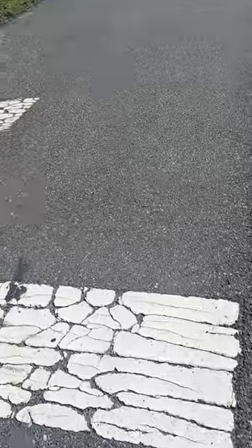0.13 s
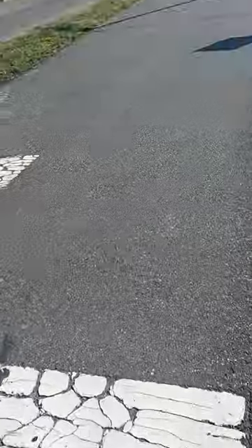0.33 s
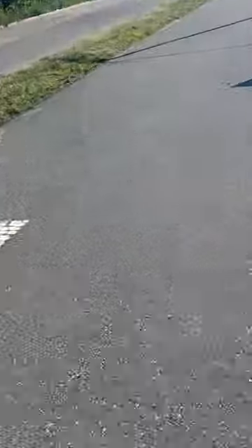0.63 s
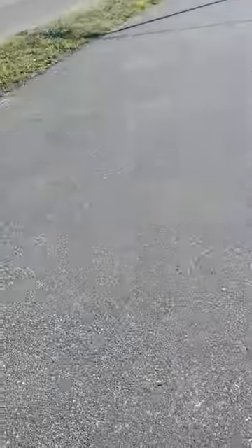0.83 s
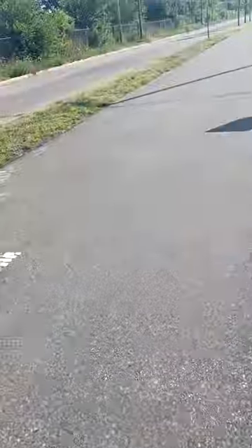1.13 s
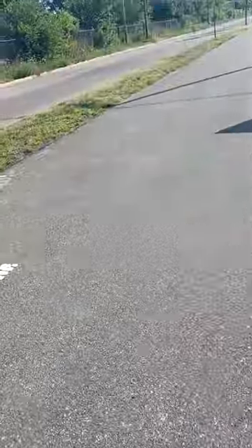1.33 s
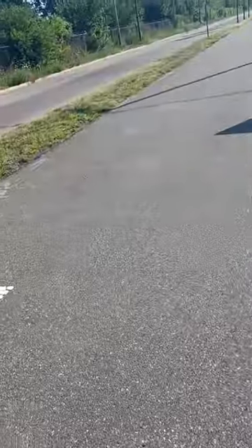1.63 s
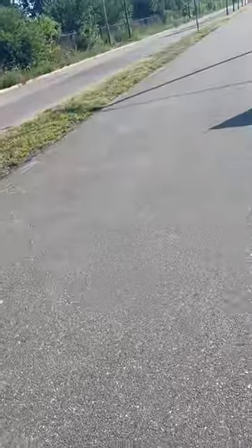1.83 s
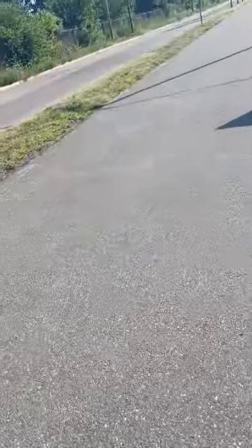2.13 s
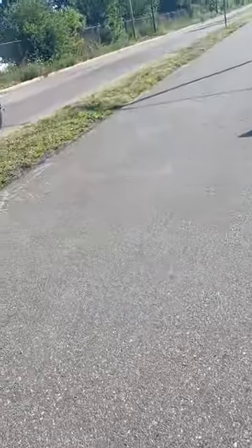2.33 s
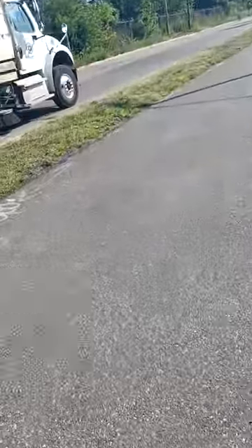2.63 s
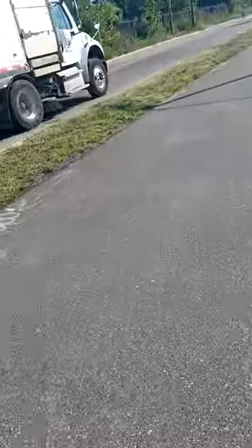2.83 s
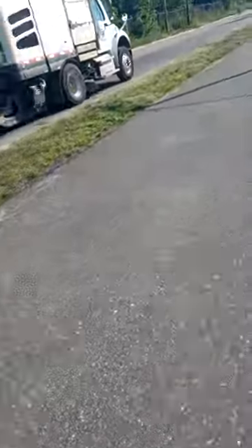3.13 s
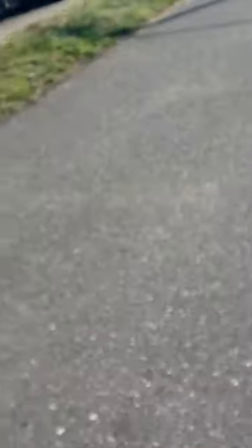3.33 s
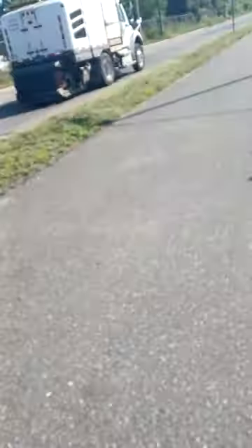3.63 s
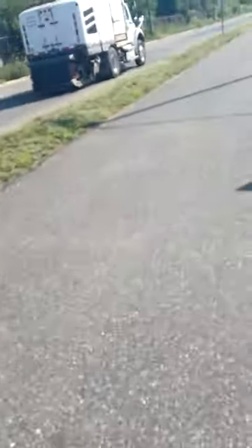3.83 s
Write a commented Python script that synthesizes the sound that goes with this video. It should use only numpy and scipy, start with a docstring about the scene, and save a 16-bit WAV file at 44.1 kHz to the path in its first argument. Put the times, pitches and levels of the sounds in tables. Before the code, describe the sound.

Close roadside stereo pickup of a diesel sweeper truck: the front roars in, the side passes with grit and thin whine, then the rear moves away, with a metallic bump and a small puff of air.

```python
"""Street sweeper truck passing outdoors

A diesel drones in rough engine orders; the front roars on approach as flutter-shaped stereo noise.
Alongside, grit ticks ring, a sharp-edged band of the roar and a thin whine sink in pitch; the rear recedes.
On leaving, jolts ring the body modes with a short rattle, and a little air spits out.
"""
import sys
import numpy as np
from scipy import signal
from scipy.fft import rfft, irfft, next_fast_len
from scipy.io import wavfile
from scipy.ndimage import map_coordinates

SR = 44100
rng = np.random.default_rng(int(sys.argv[2]) if len(sys.argv) > 2 else 0)


def generate_wav(signal):
    """Clip the signal to [-1, 1] and save it as 16-bit WAV at the path in sys.argv[1]."""
    frames = np.transpose(np.atleast_2d(signal))
    scaled = np.clip(frames, -1, 1) * 32767
    pcm = np.round(scaled).astype(np.int16)
    wavfile.write(sys.argv[1], SR, pcm)


N = 175959
T = np.arange(N) / SR
SPLIT = np.array([[.5], [-.5]])   # shares an L-R balance in dB between the channels

# diesel: (time [s], half the firing rate [Hz], level of multiple 2 [dB], of 3 [dB], of 4 [dB])
DIESEL_ORDERS = [(0.12, 43.1, -32, -39, -39), (0.5, 44.4, -30.5, -41, -38), (0.72, 44.7, -32, -40, -38),
                 (0.95, 42.3, -32.5, -31, -37), (1.2, 41.7, -31.5, -30, -36), (1.42, 43.3, -32.5, -39, -39),
                 (1.68, 45, -32, -38, -35), (1.95, 44.2, -33, -31, -38), (2.22, 39, -38, -42, -41),
                 (2.4, 37.8, -46, -41, -42), (3.35, 35.7, -50, -44, -44), (3.65, 36.2, -48, -44, -33.5),
                 (3.95, 37.7, -44, -31, -34)]
# roar of the truck's side: (time [s], level [dB])
SIDE_LEVEL = [(0.1, -32), (0.9, -27.5), (1.3, -23), (1.7, -22.5), (2.1, -22), (2.45, -24.5), (2.8, -32.5),
              (4.0, -38)]
# roar of the truck's rear: (time [s], level [dB])
REAR_LEVEL = [(0.1, -77), (1.9, -30.5), (2.4, -25), (2.8, -23.5), (3.2, -26.5), (3.7, -29), (4.0, -30.5)]
# body jolts: (time [s], level [dB], brightness [dB per octave])
JOLTS = [(3.0265, -20, -6), (3.0345, -22, -1.5), (3.057, -36, 8), (3.066, -41, 7), (3.295, -43, 8),
         (3.629, -40, 5)]


def from_db(db):
    """Decibels to gain."""
    return 10 ** (np.asarray(db) / 20)


def rms_one(x):
    """Scale to rms 1."""
    return x / np.sqrt(np.mean(x ** 2) + 1e-20)


def in_time(rows):
    """One curve per column, joined by straight lines."""
    s, *columns = np.transpose(rows)
    return [np.interp(T, s, column) for column in columns]


def at_hz(points, hz):
    """Read a spectrum on a log-frequency axis."""
    f, value = np.transpose(points)
    return np.interp(np.log(hz + 1e-3), np.log(f), value)


def phase(hz):
    """Running phase in radians of a moving frequency."""
    return 2 * np.pi * np.cumsum(hz) / SR


def bell(centre_s, length_s):
    """Gaussian rise and fall, peak 1."""
    return np.exp(-.5 * ((T - centre_s) / length_s) ** 2)


def band_passed(x, order, low_hz, high_hz):
    """Butterworth band-pass."""
    return signal.sosfilt(signal.butter(order, [low_hz, high_hz], "band", fs=SR, output="sos"), x)


def low_passed(x, order, hz):
    """Butterworth low-pass."""
    return signal.sosfilt(signal.butter(order, hz, fs=SR, output="sos"), x)


def drift(rate_hz):
    """Slow chance with spread 1: low-passed noise drawn at every 40th sample."""
    r = np.exp(-80 * np.pi * rate_hz / SR)
    noise = rng.standard_normal(N // 40 + 2002)
    slow = signal.lfilter([1], [1, -2 * r, r * r], noise)[2000:]   # drop the settling
    return np.interp(np.arange(N) / 40, np.arange(len(slow)), rms_one(slow))


def delayed(x, samples):
    """Read a signal through a fixed or moving delay."""
    return map_coordinates(x, [np.arange(N) - samples], order=3, mode="mirror")


def ring(clicks, hz, t60_s):
    """Two-pole resonator: a unit click sets a decaying sine of height 1 ringing."""
    r, w = np.exp(-np.log(1000) / (t60_s * SR)), 2 * np.pi * hz / SR
    return signal.lfilter([0, np.sin(w)], [1, -2 * r * np.cos(w), r * r], clicks + 1e-18)


def pair(mid, side, hz):
    """Left and right from two noises, less alike towards the treble."""
    # (frequency [Hz], left-right likeness [0-1])
    likeness = [(60, .997), (150, 1), (300, 0.99), (600, 0.92), (1300, 0.76), (3000, 0.44), (6000, 0.055),
                (15000, 0.057)]
    alike = np.clip(at_hz(likeness, hz), 0, .998)
    difference = np.sqrt(1 - alike) * side * np.array([[1], [-1]])
    return (np.sqrt(1 + alike) * mid + difference) / np.sqrt(2)


def diesel():
    """Slightly rough engine orders, and the firing throb that they put on the roar."""
    # higher tones of engine and belt drives: (start [s], end [s], multiple, level [dB])
    overtones = [(0, .74, 8, -34.5), (.35, 1.02, 7, -34), (.35, .9, 12.72, -32.5), (0, .85, 18.3, -39),
                 (0, .4, 6, -38), (.98, 1.25, 6, -33), (.95, 1.25, 12.6, -34), (.98, 1.2, 10.6, -35),
                 (.85, 2.1, 5.68, -35), (1.6, 1.95, 7, -37), (2.1, 2.5, 6.03, -30), (2.7, 4.1, 6.03, -38)]
    fade_s, roughness, speed_jitter, throb_depth = .16, .22, .004, .044
    hz, *levels = in_time(DIESEL_ORDERS)
    turn = phase(hz * (1 + speed_jitter * drift(8.5)))
    orders = [(k + 2, from_db(db)) for k, db in enumerate(levels)]
    for start, end, multiple, db in overtones:
        fade = np.clip(.5 + np.minimum(T - start, end - T) / fade_s, 0, 1)
        orders.append((multiple, from_db(db) * fade))
    tones = 0
    for multiple, gain in orders:
        rough_gain = gain * (1 + roughness * drift(7.4))
        tones = tones + rough_gain * np.sin(multiple * turn + 2 * np.pi * rng.random())
    throb = 1 + throb_depth * (np.cos(2 * turn) + .32 * np.cos(turn))
    return np.sqrt(2) * tones, throb


def combustion():
    """One short, uneven crack per firing, strongest as the engine bay goes by."""
    level_db, spread_db, bay_s, bay_length_s = -39.5, 1.5, 1.3, .91
    firings = np.floor(np.cumsum(2 * in_time(DIESEL_ORDERS)[0]) / SR)
    strength = from_db(spread_db * np.clip(rng.standard_normal(N), -2, 2))
    clicks = np.diff(firings, prepend=0) * strength
    cracks = band_passed(clicks + 1e-18, 2, 250, 2180)
    return rms_one(cracks) * from_db(level_db) * bell(bay_s, bay_length_s)


def roar(spectrum, balance):
    """Turbulent stereo noise whose octaves flutter on their own; rms 1 before a slow surge."""
    flutter_db, surge_db = 1.32, .5
    size = next_fast_len(N)
    hz = np.arange(size // 2 + 1) * SR / size
    colour = from_db(at_hz(spectrum, hz) + at_hz(balance, hz) * SPLIT)
    noise = pair(*rfft(rng.standard_normal((2, size))), hz) * colour
    octave, out = np.clip(np.log2(hz / 100 + 1e-9), 0, 7), 0
    for k in range(8):
        weight = np.maximum(1 - abs(octave - k), 0)
        band = irfft(noise * weight, size)[:, :N]
        out = out + band * from_db(flutter_db * drift(33))
    return rms_one(out) * from_db(surge_db * drift(2.5))


def front_roar():
    """Broad turbulent noise of the truck's front."""
    # (frequency [Hz], density [dB per Hz])
    spectrum = [(30, -48), (50, -13), (75, -7), (130, 4.5), (190, -8.5), (240, 0), (290, -6), (390, 2),
                (480, -4), (610, 2), (800, 2.5), (920, -3), (1100, -1), (1400, -12.5), (1750, -9),
                (2280, -3.5), (3050, -13), (4300, -15.5), (5300, -22.5), (7000, -25), (7900, -37),
                (10000, -32.5), (12800, -24.5), (15500, -30.5)]
    # (frequency [Hz], L-R [dB])
    balance = [(100, 4.5), (380, 3), (700, -2), (1290, 5.5), (2380, 3.5), (4400, 3.5), (7500, 14.5),
               (10000, 5), (15000, -2)]
    # (time [s], level [dB])
    level = [(0.1, -23.5), (0.55, -22), (1.0, -24), (1.4, -26), (1.9, -31.5), (2.5, -45), (4.0, -41)]
    return from_db(in_time(level)[0]) * roar(spectrum, balance)


def side_roar():
    """Broad turbulent noise of the truck's side."""
    # (frequency [Hz], density [dB per Hz])
    spectrum = [(30, -44), (55, -16), (80, -2), (130, 7), (175, 3.5), (240, 7.5), (330, 2.5), (430, 4),
                (520, -3), (640, 4), (800, -5.5), (950, -4.5), (1180, -5.5), (1380, -7.5), (1900, -1.5),
                (2750, -19.5), (3400, -20.5), (4600, -16), (5500, -19), (7000, -28), (7800, -34.5),
                (10000, -30), (12500, -25.5), (15500, -30.2)]
    # (frequency [Hz], L-R [dB])
    balance = [(100, 2), (380, -1.5), (700, -7.5), (1290, -4), (2380, -13.5), (4400, -8.5), (8000, 1.5),
               (15000, -1)]
    return from_db(in_time(SIDE_LEVEL)[0]) * roar(spectrum, balance)


def rear_roar():
    """Broad turbulent noise of the rear blower."""
    # (frequency [Hz], density [dB per Hz])
    spectrum = [(30, -29), (55, -17.5), (100, 2.5), (145, 1.5), (178, -4), (225, 4.5), (330, 0.5),
                (440, 1.5), (550, -5), (650, -5.5), (900, -7.5), (1120, -3.5), (1420, -18), (1980, -13),
                (2700, -19), (4000, -22), (5500, -32.5), (7000, -33.5), (7800, -49), (10500, -44.5),
                (13000, -36.5), (15500, -40)]
    # (frequency [Hz], L-R [dB])
    balance = [(100, -3.5), (380, 0.5), (700, -16.5), (1290, -3), (2380, -3), (4400, -4.5), (8000, 13),
               (15000, 7)]
    return from_db(in_time(REAR_LEVEL)[0]) * roar(spectrum, balance)


def ground_band():
    """Sharp-edged band of the roar, coloured by the ground reflection, sinking in pitch."""
    # (time [s], centre [Hz], level [dB])
    sinking = [(0.9, 2180, -55), (1.22, 2130, -29.5), (1.45, 2080, -37), (1.85, 2052, -42.5),
               (2.1, 1890, -39), (2.4, 1815, -46), (2.8, 1750, -65)]
    width_hz, pan_db = 950, 1
    hz, db = in_time(sinking)
    turn = phase(hz)
    a, b = low_passed(rng.standard_normal((2, 2, N)), 6, width_hz / 2)
    shifted = a * np.sin(turn) + b * np.cos(turn)   # low noise carried up to the centre
    return rms_one(pair(*shifted, hz.mean())) * from_db(db + pan_db * SPLIT)


def grit():
    """Bristles flick grit: dense ticks ring twelve high modes, following side and rear levels."""
    ticks_per_s, level_db, spread_db = 240, -34, -1.5   # level against the side roar
    sizes = from_db(spread_db * np.minimum(rng.exponential(1, N), 4)) * rng.choice([-1, 1], N)
    clicks = sizes * (rng.random(N) < ticks_per_s / SR)
    dealt = rng.integers(0, 12, N)   # the mode each tick strikes
    modes_hz = np.geomspace(1600, 6500, 12)
    ticks = rms_one(sum(ring(clicks * (dealt == k), hz, 7 / hz) for k, hz in enumerate(modes_hz)))
    side, rear = from_db(in_time(SIDE_LEVEL)[0]), from_db(in_time(REAR_LEVEL)[0])
    return (side + rear / 2) * from_db(level_db) * ticks


def fan():
    """Suction fan hum: one sine of moving pitch, loudest alongside."""
    # (time [s], frequency [Hz], level [dB])
    hum = [(0.1, 209, -44), (1.15, 203, -42), (1.4, 205, -32), (1.65, 209, -27), (2.05, 204, -31),
           (2.4, 201, -44), (4.0, 200, -46)]
    hz, db = in_time(hum)
    return np.sqrt(2) * from_db(db) * (1 + .083 * drift(3)) * np.sin(phase(hz))


def whine():
    """Breathy, fluttering hydraulic tone: narrow and wide noise on a carrier that sinks in pitch."""
    # (time [s], frequency [Hz], level [dB], share of wide hiss [0-1])
    tone = [(0.1, 4820, -41, 1), (1.1, 4750, -42, .92), (1.5, 4590, -46, .8), (1.85, 4560, -42.5, .75),
            (2.2, 4420, -45, .6), (2.43, 4378, -40.5, .5), (2.56, 4355, -45, .4), (2.68, 4340, -45.5, .35),
            (2.77, 4310, -59, .2), (4.0, 4290, -62, .3)]
    # (time [s], L-R [dB])
    tone_balance = [(1.5, 4), (2.3, -10)]
    narrow_hz, hiss_hz, flutter_db = 45, 260, 1.8
    hz, db, wide = in_time(tone)
    turn, wide = phase(hz), np.clip(wide, 0, 1)

    def carried(width_hz):
        return drift(width_hz) * np.sin(turn) + drift(width_hz) * np.cos(turn)

    mid, side = (np.sqrt(1 - wide) * carried(narrow_hz) + np.sqrt(wide) * carried(hiss_hz)
                 for _ in range(2))
    balance_db = in_time(tone_balance)[0] * SPLIT
    return from_db(db + balance_db + flutter_db * drift(7.6)) * pair(mid, side, hz.mean())


def swelling_bands(rows):
    """Bands of noise, each rising and falling in a bell shape."""
    out = 0
    for s, length_s, hz, width_hz, db in rows:
        low_hz, high_hz = max(hz - width_hz / 2, 20), min(hz + width_hz / 2, SR / 2 - 10)
        noise = pair(*band_passed(rng.standard_normal((2, N)), 2, low_hz, high_hz), hz)
        out = out + rms_one(noise) * from_db(db) * bell(s, length_s)
    return out


def roar_swells():
    """Bands of the roar that briefly swell, low to high."""
    # (time [s], length [s], frequency [Hz], width [Hz], level [dB])
    swells = [(0.91, 0.085, 218, 50, -31.5), (0.89, 0.22, 850, 120, -30.5), (1.07, 0.12, 608, 190, -30.5),
              (1.61, 0.14, 750, 220, -28), (1.83, 0.22, 3300, 560, -37.5), (1.9, 0.13, 5200, 950, -45),
              (1.36, 0.2, 485, 45, -35), (2.16, 0.07, 277, 46, -29), (2.28, 0.079, 312, 56, -27),
              (2.364, 0.069, 405, 60, -28), (2.3, 0.25, 1140, 220, -35), (2.48, 0.07, 2600, 220, -39),
              (4.05, 0.12, 120, 28, -31), (3.96, 0.1, 240, 64, -32)]
    return swelling_bands(swells)


def whistle():
    """Narrow band of noise, brief as the side goes by."""
    # (time [s], length [s], frequency [Hz], width [Hz], level [dB])
    whistles = [(1.97, .16, 5160, 60, -51)]
    return swelling_bands(whistles)


def high_hiss():
    """High bands of hiss that rise and fall, louder on the right."""
    # (time [s], length [s], frequency [Hz], width [Hz], level [dB])
    hisses = [(1.35, 0.25, 13600, 3000, -50), (3.3, 0.12, 3900, 1200, -42.5), (3.5, 0.5, 13150, 480, -59)]
    pan_db = -7.5
    return swelling_bands(hisses) * from_db(pan_db * SPLIT)


def spit():
    """A puff of bright hiss that swells to a point and dies."""
    # (frequency [Hz], density [dB per Hz])
    spectrum = [(5000, -16), (8200, -16), (10500, -11), (13300, 0), (15500, -7)]
    peak_s, fade_s, level_db = 3.262, .035, -41
    hz = np.arange(N // 2 + 1) * SR / N
    hiss = irfft(rfft(rng.standard_normal((2, N))) * from_db(at_hz(spectrum, hz)), N)
    return rms_one(hiss) * from_db(level_db) * np.exp(-abs(T - peak_s) / fade_s)


def knocks():
    """Each jolt strikes every steel body mode at its own strength; right ear later and louder."""
    # (frequency [Hz], level [dB], t60 [s])
    body = [(1010, 2, .028), (1230, 8.5, .026), (1480, 3, .028), (2750, -7, .025), (3150, -7, .025),
            (4600, -6, .025)]
    left_db, right_lag_s, contact_hz = -4.5, .00016, 5800   # jolts hold little above contact_hz
    s, db, bright = np.transpose(JOLTS)
    out = 0
    for k, (hz, mode_db, t60_s) in enumerate(body):
        strike_db = db + mode_db + bright * np.log2(hz / 1400) + rng.normal(0, 1.5, len(s))
        clicks = np.zeros(N)
        clicks[(s * SR).astype(int)] = from_db(strike_db)
        out = out + ring(clicks, hz, t60_s) * (-1) ** k
    out = low_passed(out, 4, contact_hz)
    return np.array([out * from_db(left_db), delayed(out, right_lag_s * SR)])


def rattle():
    """Loose metal: a short, dying noise chatter after each jolt, tilted by the jolt's brightness."""
    level_db, t60_s, low_hz, high_hz = -10, .065, 1000, 5450   # level against the jolt
    hz, out = np.arange(1, N // 2 + 2) * SR / N, 0
    for s, db, bright in JOLTS:
        noise = rms_one(band_passed(rng.standard_normal((2, N)), 8, low_hz, high_hz))
        tilt = from_db(bright * np.log2(np.minimum(hz, high_hz) / 1400))
        decay = (T > s) * np.exp(-np.log(1000) * np.clip(T - s, 0, 1) / t60_s)
        out = out + irfft(rfft(noise) * tilt, N) * from_db(db + level_db) * decay
    return out


def passing(x):
    """A moving delay between the ears swings the sound across as the truck goes by."""
    # (time [s], lag of the left ear [samples])
    left_lag = [(0.1, 10), (0.8, 6), (1.25, 5), (1.75, 3), (2.25, -3.5), (2.7, -8), (3.2, -7), (4.0, -11)]
    lag, = in_time(left_lag)
    return np.array([delayed(x[0], lag / 2), delayed(x[1], -lag / 2)])


def scene():
    """Front, side and rear of the truck take turns over the engine."""
    drone, throb = diesel()
    engine = drone + combustion()
    rush = throb * (front_roar() + side_roar() + ground_band()) + rear_roar() + roar_swells()
    air = whistle() + high_hiss() + spit()
    body = knocks() + rattle()
    return passing(engine + rush + grit() + fan() + whine() + air + body)


def record(dry):
    """The microphone thins the deep bass, opens abruptly and cuts the top."""
    start_s, cutoff_hz = .1152, 15900
    thin = signal.sosfilt(signal.butter(2, 45, "high", fs=SR, output="sos"), dry)
    opened = thin * np.where(T < start_s, from_db(-82), 1)
    return signal.sosfilt(signal.ellip(12, .1, 90, cutoff_hz, fs=SR, output="sos"), opened)


dry = scene()
out = record(dry)
generate_wav(out)
```